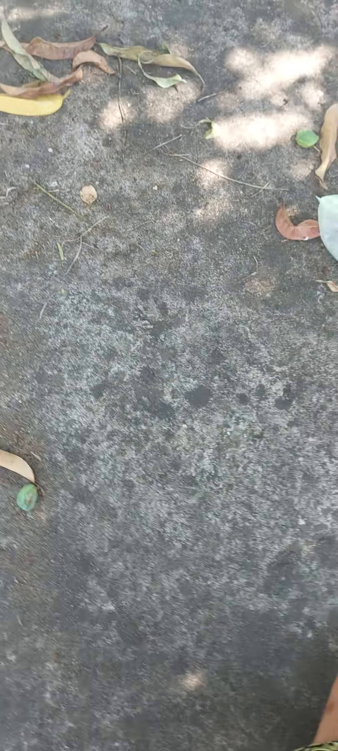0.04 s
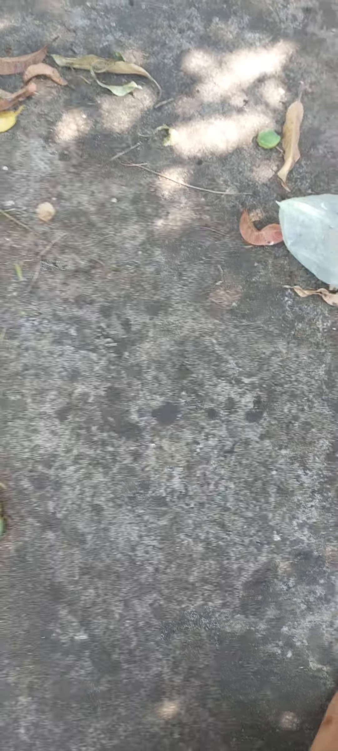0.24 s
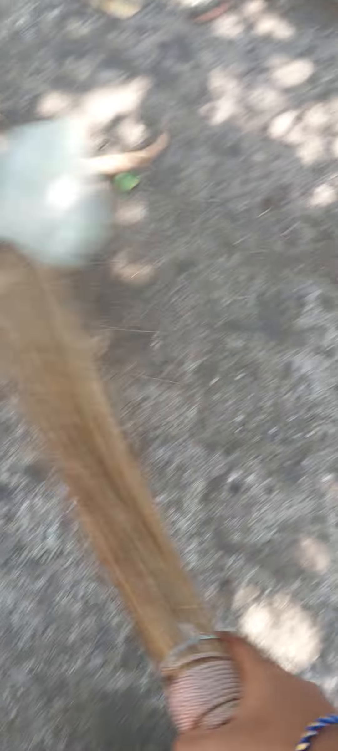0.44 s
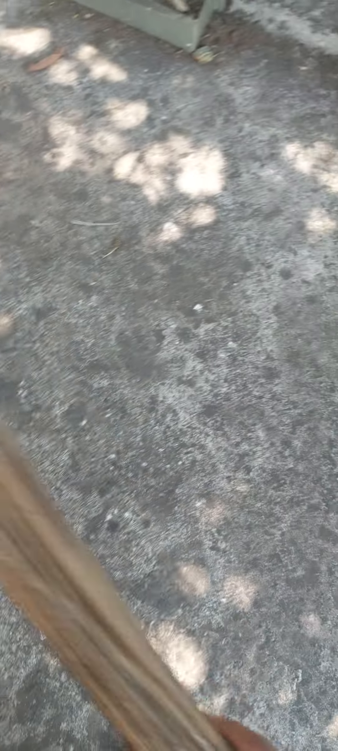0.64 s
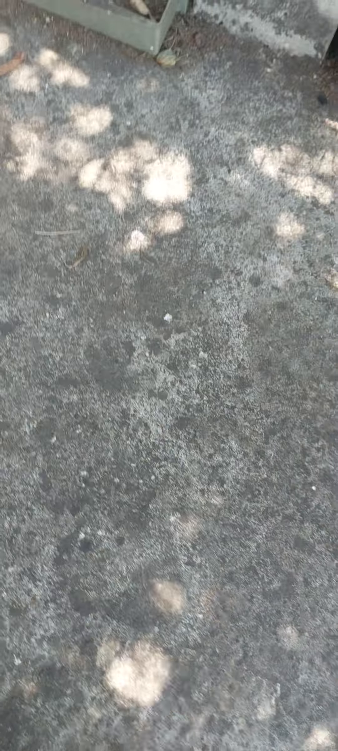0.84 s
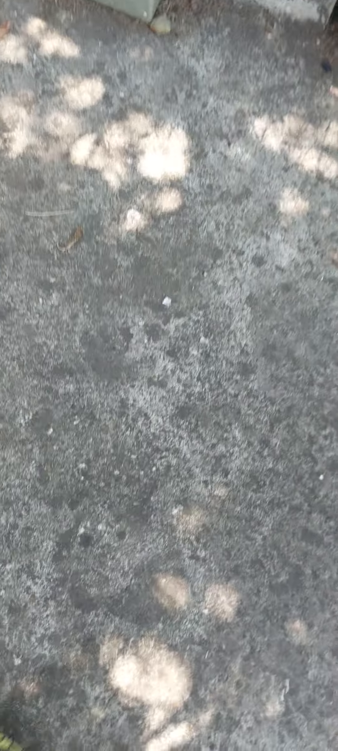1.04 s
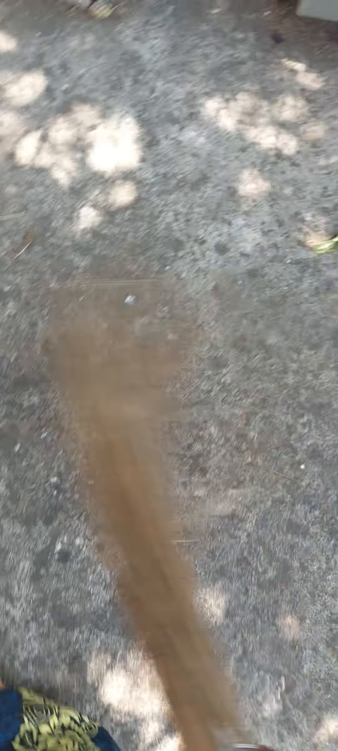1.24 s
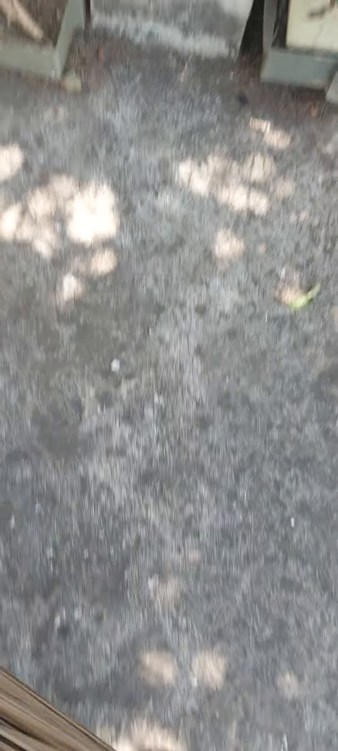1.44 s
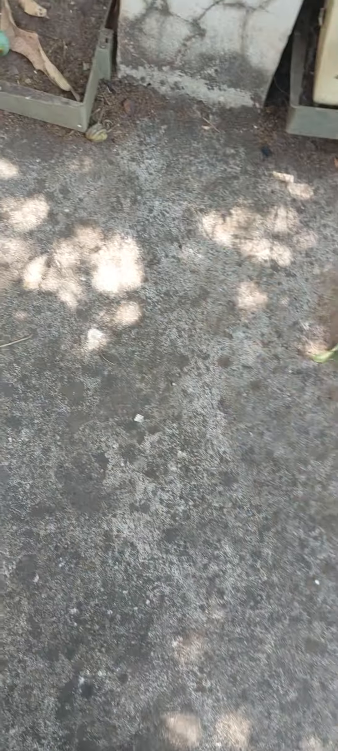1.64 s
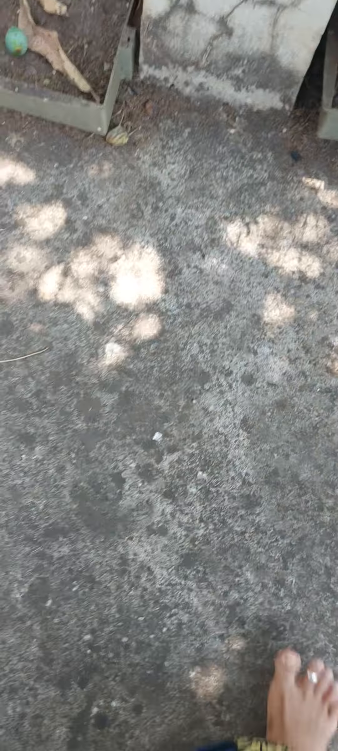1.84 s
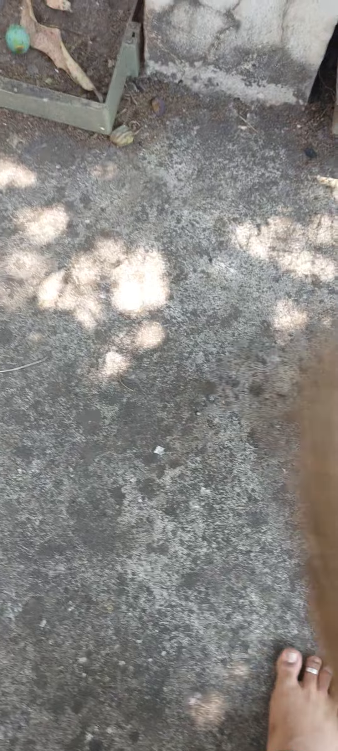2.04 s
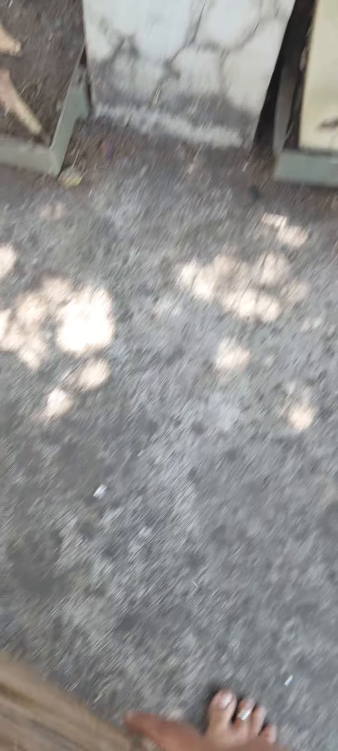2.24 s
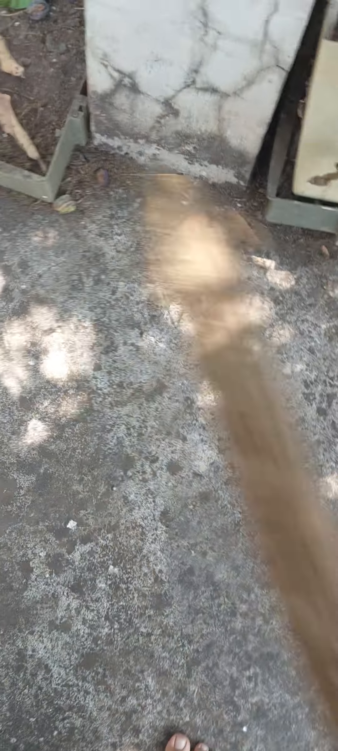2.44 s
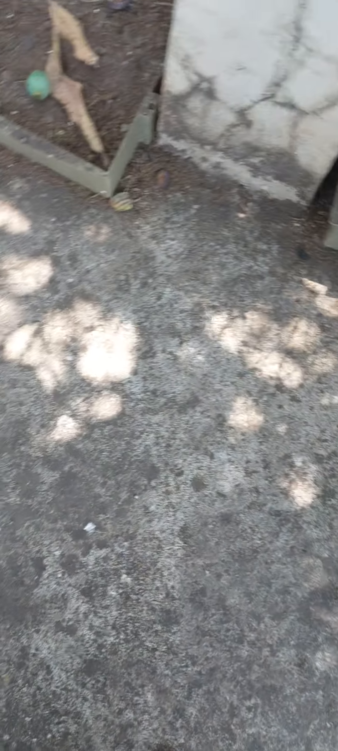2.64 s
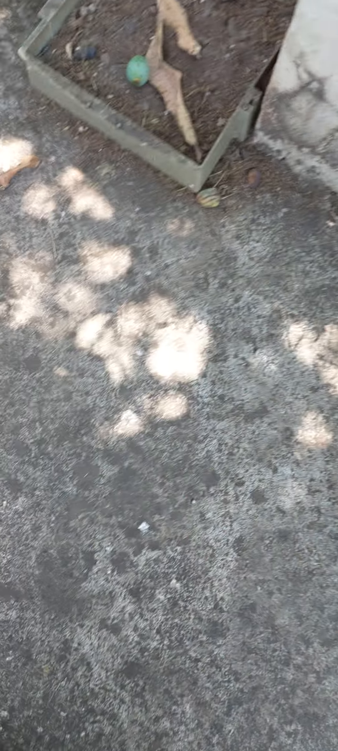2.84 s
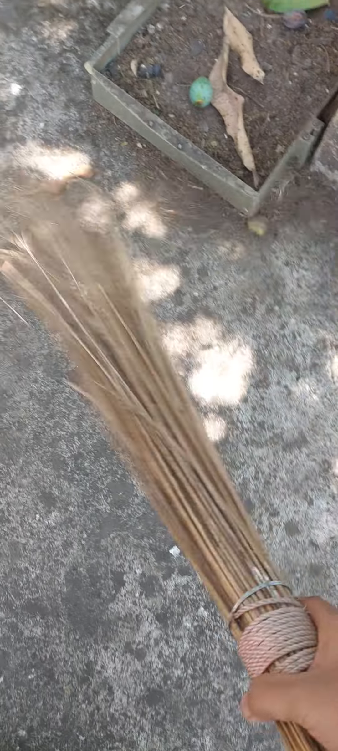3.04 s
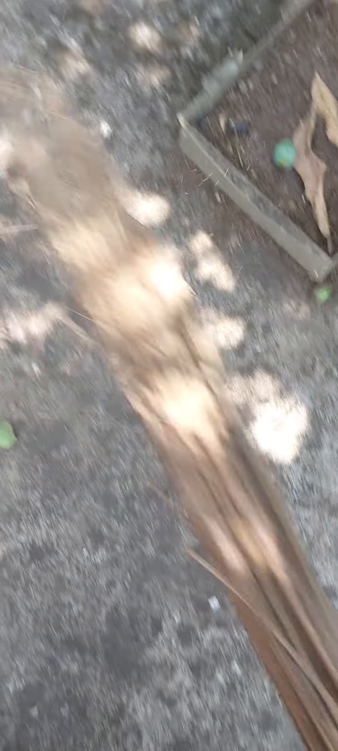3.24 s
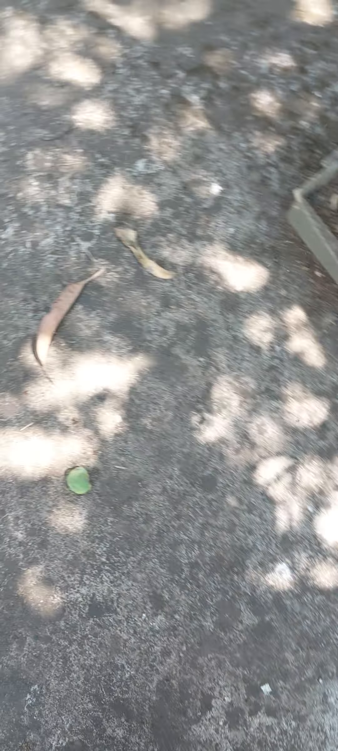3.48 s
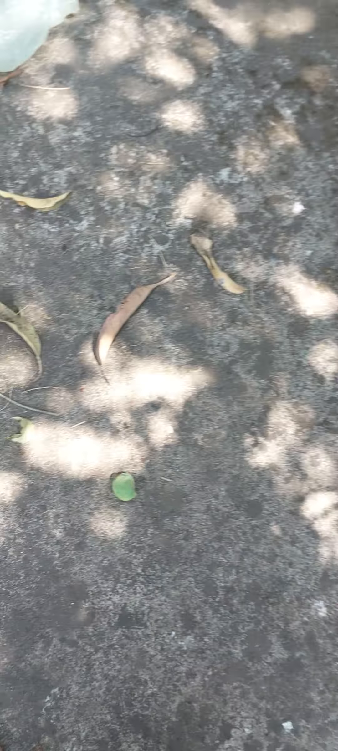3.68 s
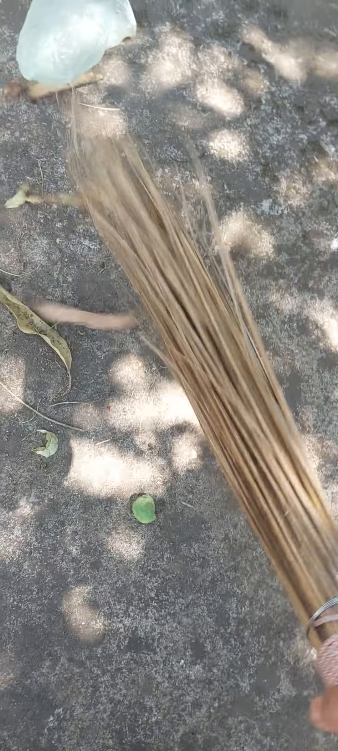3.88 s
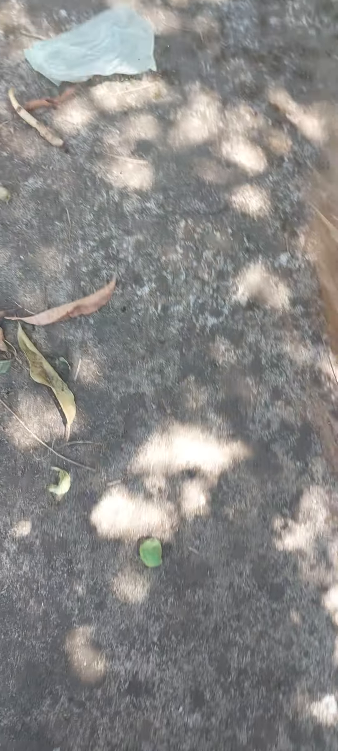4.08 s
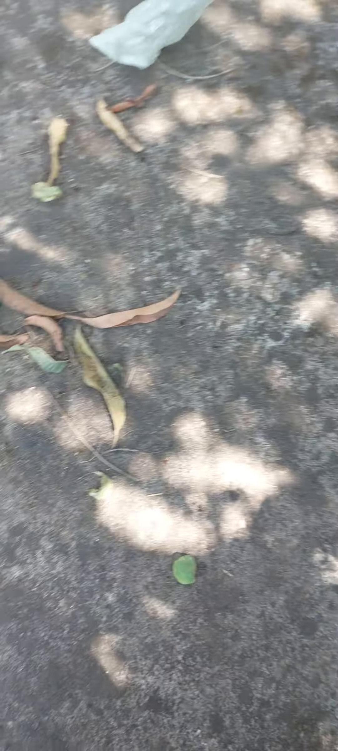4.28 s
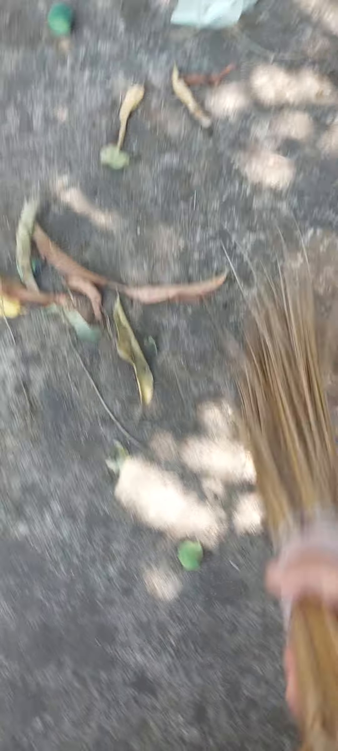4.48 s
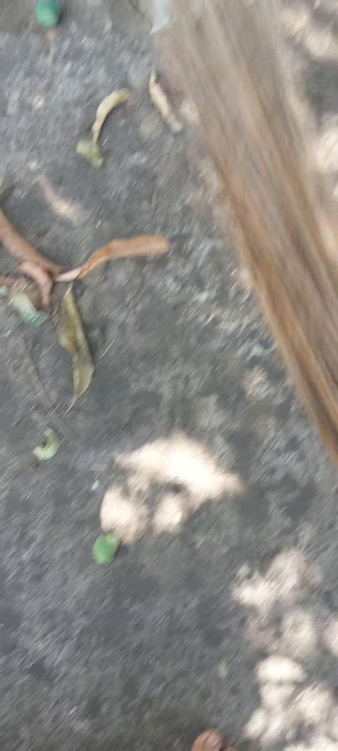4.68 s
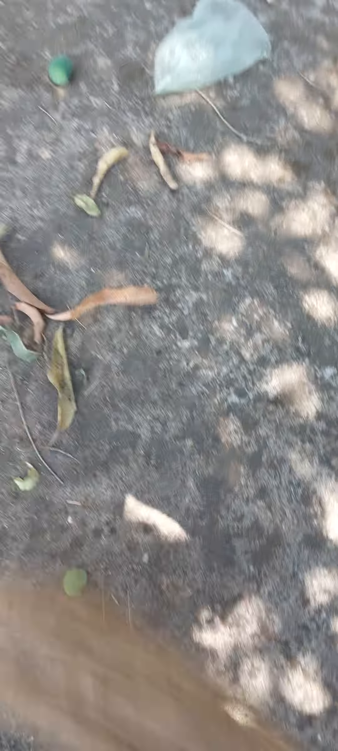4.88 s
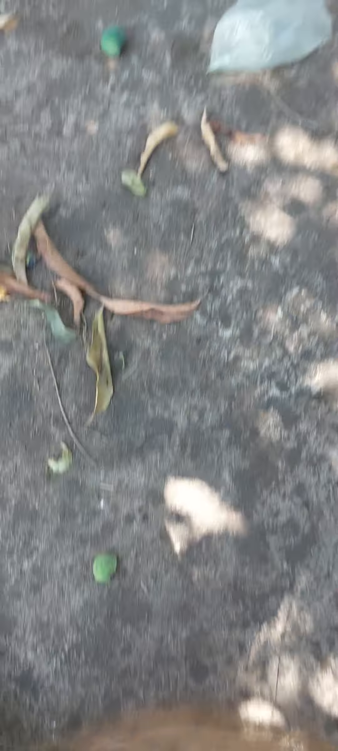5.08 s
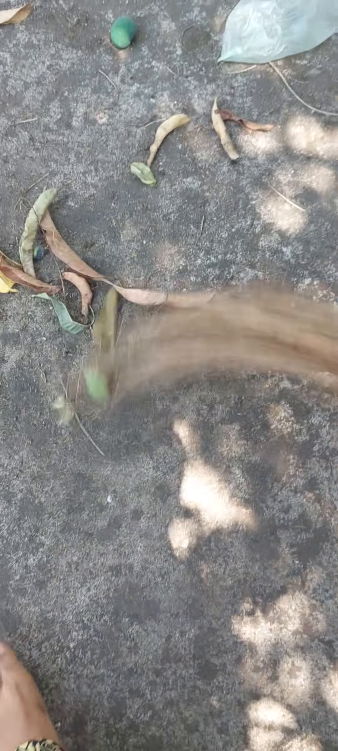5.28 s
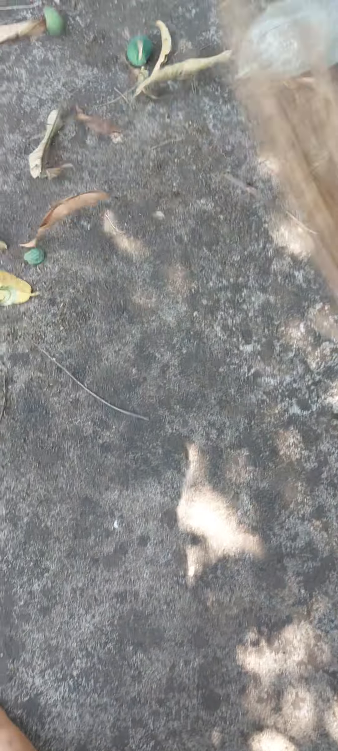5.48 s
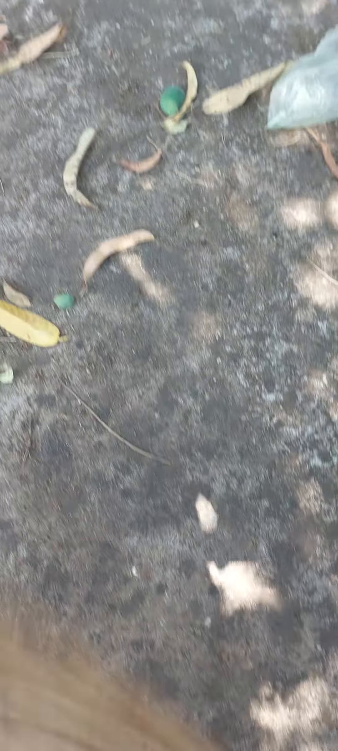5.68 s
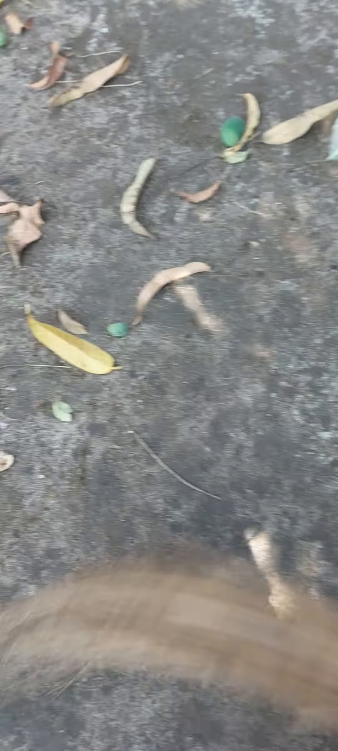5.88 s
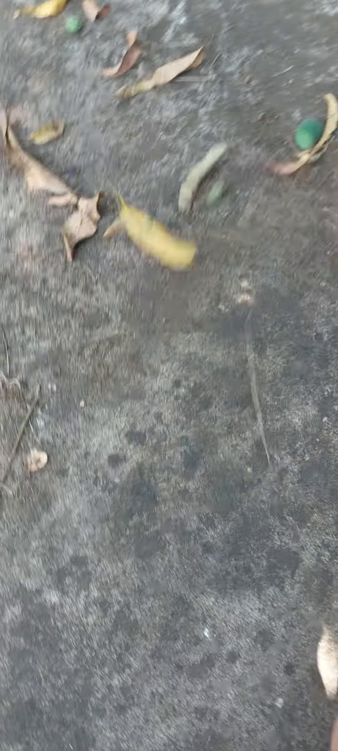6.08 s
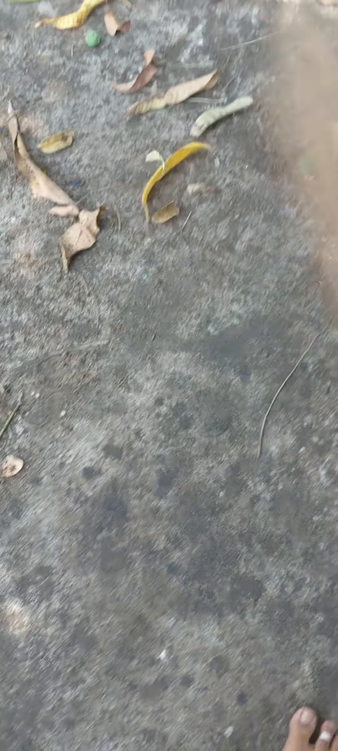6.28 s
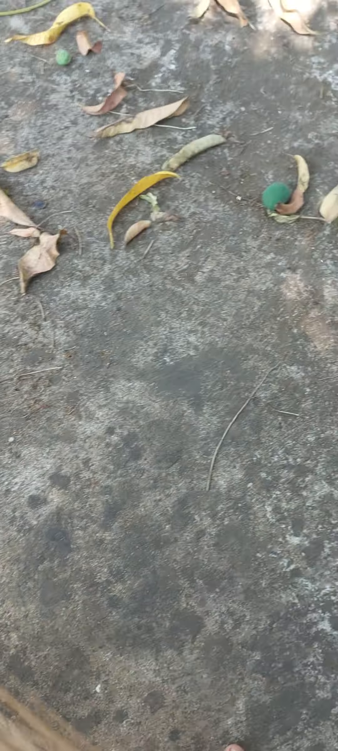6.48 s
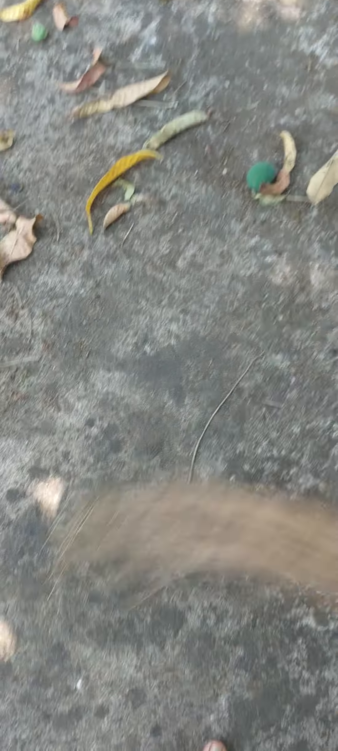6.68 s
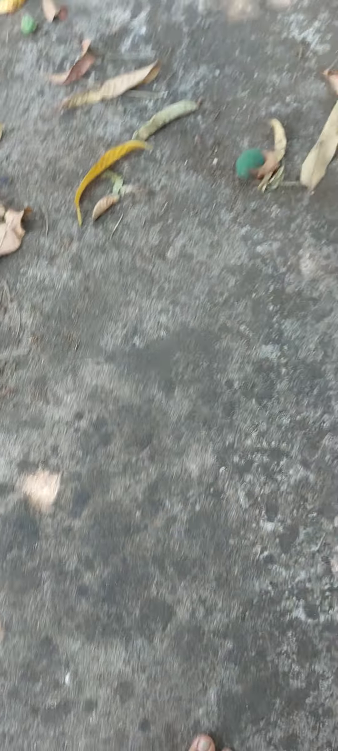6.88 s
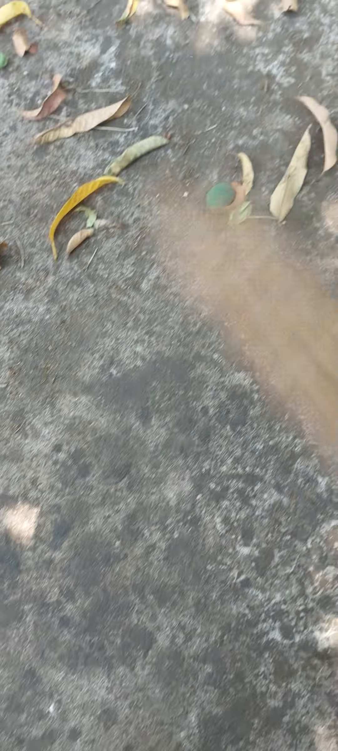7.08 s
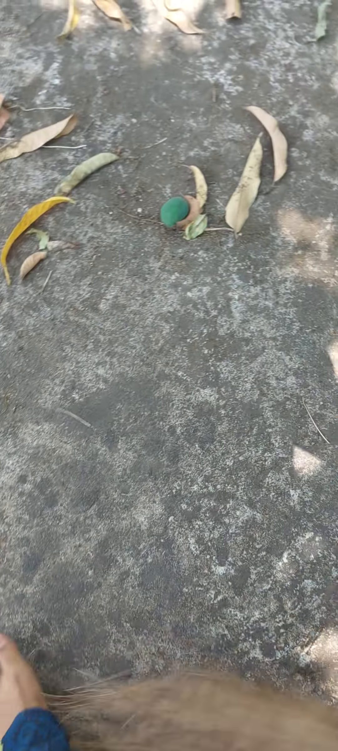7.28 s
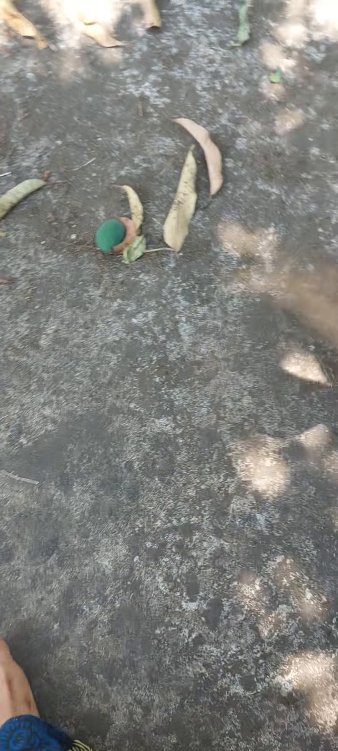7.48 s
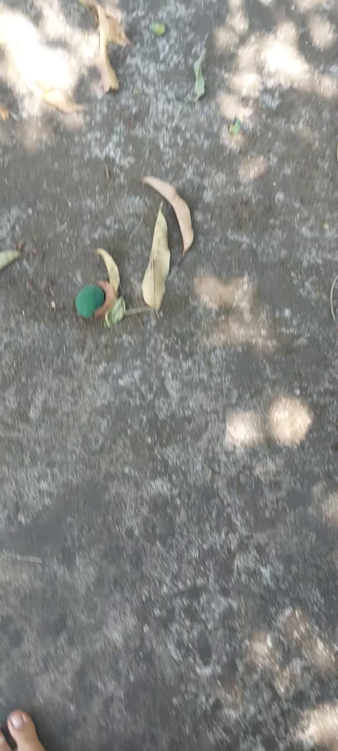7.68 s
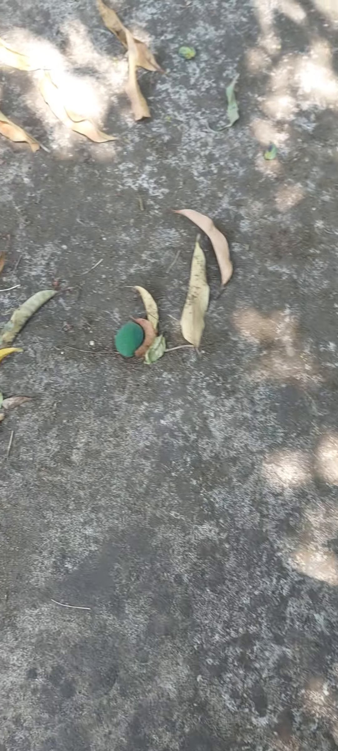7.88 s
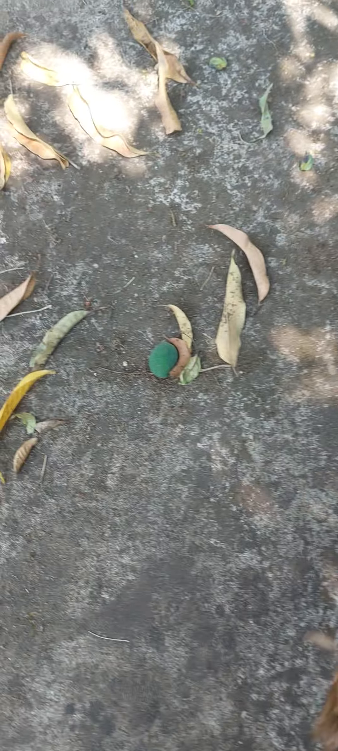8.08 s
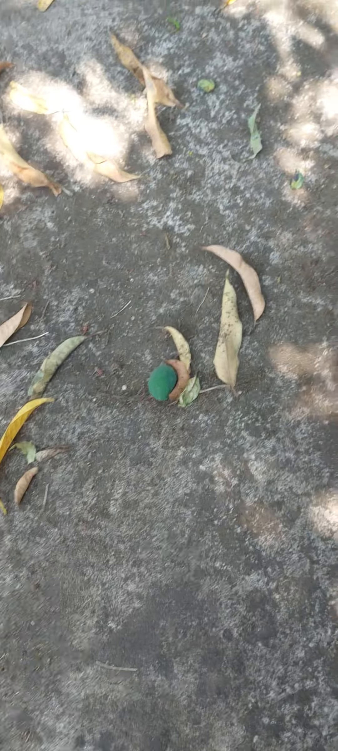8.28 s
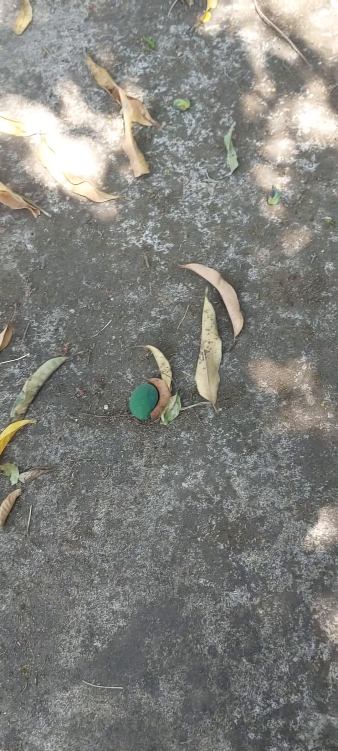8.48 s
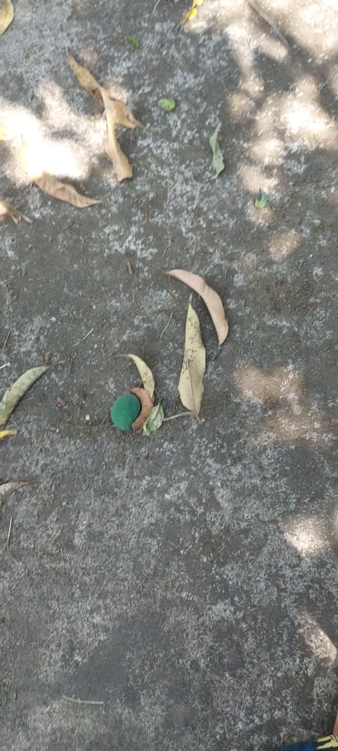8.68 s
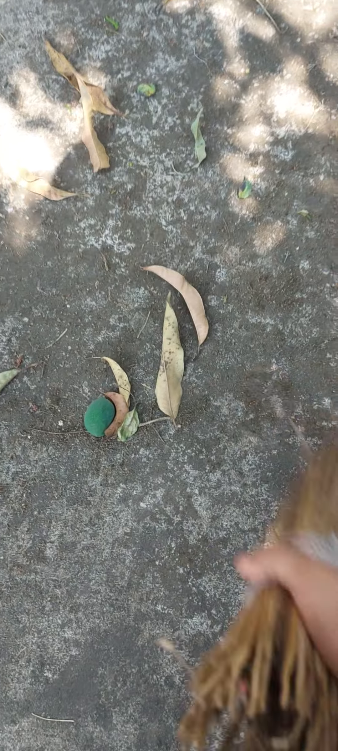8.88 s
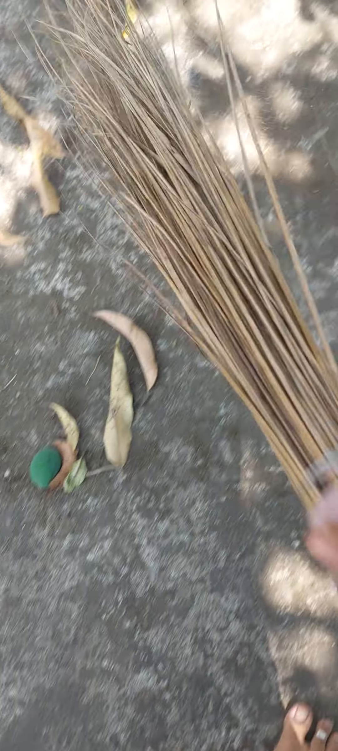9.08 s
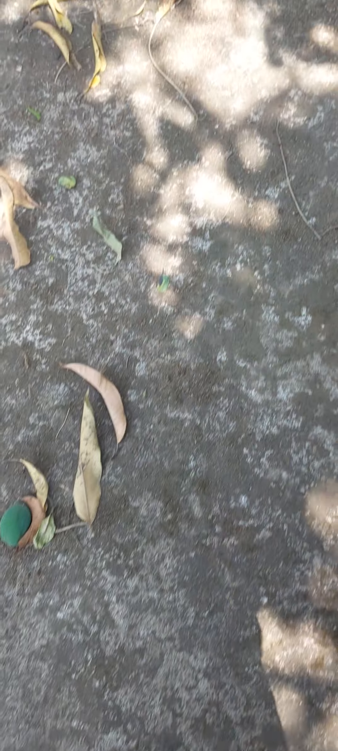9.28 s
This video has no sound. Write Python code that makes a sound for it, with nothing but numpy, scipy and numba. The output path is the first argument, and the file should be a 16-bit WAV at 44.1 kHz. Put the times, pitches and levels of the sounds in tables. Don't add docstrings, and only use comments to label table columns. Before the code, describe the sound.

Gritty rhythmic broom swishes with leaf rustle, twig cracks and dull knocks on a concrete yard, over a faint low single-cylinder engine.

```python
import sys
import numpy as np
from scipy import signal
from scipy.fft import rfft, irfft, next_fast_len
from scipy.io import wavfile
from scipy.ndimage import uniform_filter1d
from numba import njit

SR = 44100
rng = np.random.default_rng(int(sys.argv[2]) if len(sys.argv) > 2 else 0)


def voltage_ratio(decibels):
    exponent = np.asarray(decibels, float) / 20
    return 10 ** exponent


def bounce(signal):
    frames = np.transpose(np.atleast_2d(signal))
    limited = np.clip(frames, -1, 1)
    pcm = np.round(limited * 32767).astype(np.int16)
    wavfile.write(sys.argv[1], SR, pcm)


N = 411453
T = np.arange(N) / SR
SIDES = np.array([[1], [-1]])

# (full contact [s], hold [s], twig tips [dB], rise [s], fall [s])
STROKES = [(0.395, .16, -25, .11, .09), (1.22, .19, -25, .08, .075), (2.057, .19, -25.5, .085, .11),
           (2.915, .25, -25, .12, .075), (3.788, .13, -24, .14, .16), (4.5, .11, -25, .17, .17),
           (5.28, .14, -24, .2, .14), (6.079, .065, -23.5, .3, .14), (6.787, .09, -24.5, .27, .19),
           (7.478, .1, -25, .21, .1), (8.16, .14, -28.5, .2, .16), (8.958, .075, -21.5, .24, .3)]
# (time [s], level [dB], hold [s], change while holding [dB])
DRAGS = [(0.0, -44.5, 0.23, -22), (0.601, -43, .17, -6), (0.783, -45.5, 0.071, -11),
         (0.867, -50.5, 0.3, -18), (1.466, -45.5, 0.1, -10), (1.597, -48.5, 0.085, -8.5),
         (1.895, -63, 0.071, 3), (1.996, -40, .03, 4), (2.346, -50.5, 0.35, -12), (2.59, -54, 0.078, -15),
         (2.847, -42, .05, 6), (3.25, -51, 0.11, 1), (3.392, -51.5, 0.1, -14), (3.561, -44, .03, 3),
         (3.597, -41, 0.097, -15.5), (4.079, -52, 0.13, 0), (4.295, -30, .12, -12), (5.029, -33, .07, -9),
         (5.148, -37, .05, 0), (5.5, -38, .27, -15.5), (5.817, -35, .08, -10), (6.236, -45, 0.26, -15),
         (6.605, -47, .08, 3), (7.03, -59, .06, -6), (7.11, -52, .08, -4), (7.276, -36.5, .11, -5),
         (7.411, -36, .04, 0), (7.646, -46.5, .16, -20), (7.933, -59, .04, 3), (7.976, -41, .1, -2.5),
         (8.44, -52.5, .1, -5), (8.63, -59.5, 0.074, 8), (8.714, -41, 0.08, -6), (9.237, -47, .1, 3)]
# (time [s], body over treble [dB], low end over body [dB])
PRESSURE = [(.45, 1.5, -3.5), (1.3, -0.5, -1.5), (2.15, -2, -0.5), (3.0, 0, -4), (3.6, -3.5, -2.5),
            (3.85, 1.5, -4), (4.32, -1.5, 1), (4.55, 2.5, -4.5), (5.06, -3, 3.5), (5.33, -0.5, 0),
            (5.86, -2, 8), (6.1, -0.5, -2.5), (6.62, -3, 4), (6.8, -3.5, -1.5), (7.3, 0.5, 3),
            (7.52, -3, 0.5), (8.221, 3, -4), (8.74, 1, 1), (9.0, 0.5, -4.5)]
# (frequency [Hz], density [dB per Hz])
TIP_TONE = [(590, -18.5), (1000, -15.5), (1350, -10.5), (1830, -4), (2410, -6.5), (3270, -4.5), (4020, -6),
            (4730, -4), (7530, -2.5), (8500, -5), (10100, -1.5), (11300, 4), (13000, 4), (15100, 3.5),
            (16000, -2)]
# (time [s], level [dB], gather [s], scatter [s], ring [Hz])
PILES = [(.54, -22.5, 0.23, 0.19, 4360), (1.38, -34, 0.45, 0.3, 4300), (2.24, -29.5, 0.31, 0.18, 4075),
         (3.15, -31.5, 0.44, 0.28, 4220), (3.921, -29.5, 0.11, 0.49, 4500), (4.55, -31.5, 0.4, 0.44, 3720),
         (5.27, -29.5, 0.25, 0.1, 3250), (5.45, -22.5, 0.17, 0.14, 4418), (6.15, -31, 0.64, 0.6, 4550),
         (6.78, -29, 0.17, 0.44, 3532), (6.96, -29.5, 0.41, 0.13, 4920), (7.49, -34.5, 0.5, 0.41, 3620),
         (8.26, -38.5, 0.48, 0.48, 3780), (9.0, -31, 0.41, 0.42, 4100)]
# (time [s], level [dB], hold [s], change while holding [dB])
TUMBLES = [(0.0, -39, 0.054, -0.5), (0.624, -37, 0.23, -3.5), (0.797, -32, 0.025, -5),
           (0.865, -40, 0.29, -4.5), (1.87, -49, 0.1, 1.5), (2.325, -43, 0.25, 0.5),
           (2.668, -39, 0.086, -17), (3.256, -50, 0.065, 9), (4.08, -56, 0.22, -4),
           (5.54, -32.5, 0.28, -0.5), (6.405, -61, 0.13, 19.5), (7.061, -52, 0.13, 4), (7.42, -38, .04, 3),
           (7.858, -41.5, 0.011, -23), (8.497, -58, 0.081, 4), (9.208, -46.5, 0.15, 0.5)]
# (time [s], left over right [dB])
BROOM_PLACE = [(0.0, 0.0), (1.5, -2.5), (2.1, -4), (3.3, -.5), (3.56, -7), (3.77, -1), (4.24, -5),
               (4.62, 3.5), (4.99, -6), (5.53, -1.5), (6.08, -4.5), (6.4, -2), (6.86, -6.5), (7.58, -7),
               (8.26, .5), (8.7, -3.5), (9.07, 3.5)]
# (frequency [Hz], density [dB per Hz])
MURMUR_TONE = [(18, -32), (30, -10.5), (86, -4), (124, -12), (250, -15), (440, -22), (700, -34.5),
               (1460, -25.5), (3060, -33.5), (3580, -27.5), (8520, -44), (16000, -43)]
# (time [s], level [dB])
LULL = [(0, 3), (1.2, 3), (1.6, -3.5), (2.0, -2), (2.5, -2.5), (3.6, -3), (4.5, 2), (9.33, -1)]
# (time [s], level [dB])
BRAKE_SQUEAL = [(4.58, -80), (4.66, -67), (5.01, -67), (5.06, -80)]
# (time [s], level [dB], pitch [Hz])
THUDS = [(.03, -58, 62), (.5, -51, 88), (1.35, -58, 65), (1.8, -52, 66), (1.92, -49, 52.2), (2.2, -55, 105),
         (2.28, -58, 72.5)]
# (time [s], peak [dB])
TICKS = [(0.1889, -48), (0.7513, -41), (0.808, -34), (1.1053, -43), (1.1357, -39), (1.7446, -43),
         (3.261, -36), (3.2908, -37), (6.5479, -35), (7.1125, -35), (7.1775, -38), (7.224, -38),
         (7.7392, -37), (8.4834, -41), (8.508, -40), (8.5204, -40), (8.5269, -37), (8.5648, -40),
         (8.5804, -45), (8.5953, -41), (8.6217, -44), (8.6626, -44)]
# (time [s], peak [dB], body over treble [dB], decay t60 [s])
FLICKS = [(.22, -30, -7.5, 0.017), (0.2504, -37.5, 1, 0.011), (.5043, -10, -13, 0.032),
          (0.6548, -30.5, 5.5, 0.033), (.6917, -32, 5, .015), (.785, -29.5, 7, 0.011),
          (0.8616, -25, 3.5, 0.049), (1.0787, -37, -6, .012), (1.541, -38, -5, 0.0099),
          (1.5928, -29.5, -6, .03), (1.6265, -37, -5, 0.013), (2.3675, -33.5, -2, 0.018),
          (2.47, -36.5, 7, 0.017), (2.545, -41, -2, .012), (2.587, -35, -7, .035), (2.662, -39, -12, .015),
          (3.159, -21, 4, .015), (3.3328, -28.5, -3, 0.016), (3.357, -29.5, -9, .012),
          (3.3755, -37, -7, 0.01), (3.458, -41, -6, .012), (3.493, -35, -5, 0.014), (3.5285, -42, -13, .04),
          (3.5513, -36, -14, 0.037), (3.5997, -37, -2, .02), (3.861, -18.5, 8.5, 0.02),
          (4.145, -46, -9, .02), (4.1818, -32, -4, .012), (4.1877, -35.5, -8, .012),
          (4.249, -38, -12, .012), (4.4413, -21, -19, .02), (5.038, -31, -9, 0.019), (5.5318, -28, -1, .03),
          (5.5643, -21, -6, .03), (5.5976, -29.5, 12.5, 0.082), (5.654, -23.5, 3, 0.04),
          (5.7803, -31, 4, 0.035), (5.8104, -20.5, -2, .03), (6.1769, -12, -10, 0.018),
          (6.4448, -38, -3, 0.029), (6.5017, -41, 8, .04), (6.526, -33, 1, 0.021), (7.1075, -32, -13, 0.03),
          (7.646, -33, 4, .015), (7.65, -34, 2, 0.019), (7.8313, -39, -10, 0.011),
          (7.8386, -36.5, -3, .015), (7.8475, -32, -5, 0.043), (7.9223, -32, -17, 0.013),
          (7.968, -33, -10, .03)]
# (frequency [Hz], level [dB])
FLICK_TREBLE = [(4500, -22), (6500, -6), (7400, 1.5), (8700, -8.5), (11500, -1.5), (15800, -12)]
FLICK_BODY = [(500, -32), (1500, -4.5), (4500, -1), (6500, -12)]
# (time [s], peak [dB], ring [Hz], crackle length [s])
SNAPS = [(0.225, -32, 5020, 0.0076), (0.249, -30.5, 5980, 0.0037), (0.506, -19, 4480, 0.059),
         (0.61, -28, 5020, 0.021), (0.657, -30, 5200, 0.011), (0.689, -27.5, 5330, 0.0098),
         (0.785, -26, 2100, 0.0038), (0.794, -41, 3300, 0.029), (0.87, -31, 3500, 0.025),
         (1.594, -30, 5500, 0.0085), (2.464, -39, 1700, 0.04), (2.492, -37.5, 2600, 0.017),
         (3.159, -19.5, 4660, 0.028), (3.332, -34.5, 3920, 0.018), (3.376, -45, 4050, 0.017),
         (3.41, -37, 4100, .012), (3.492, -27.5, 4210, 0.004), (3.857, -29, 2360, 0.018),
         (3.97, -20, 3550, .015), (4.056, -29.5, 3200, 0.021), (4.112, -43, 4500, .02),
         (4.1823, -29, 4830, 0.0045), (4.191, -30, 4840, 0.0051), (5.427, -20, 4700, 0.05),
         (5.477, -15, 4730, 0.027), (5.532, -30, 4000, 0.009), (5.6, -17.5, 3940, 0.018),
         (5.654, -26, 3520, .02), (5.709, -30, 3404, 0.013), (5.777, -29, 3320, 0.025),
         (5.807, -25, 3550, 0.014), (5.82, -16, 3350, .006), (6.176, -17, 4070, 0.0052),
         (6.5, -41, 2500, 0.019), (6.529, -35.5, 2706, .012), (7.074, -35, 4545, 0.0053),
         (7.149, -36, 4440, .005), (8.482, -35, 4700, .005), (8.521, -41, 4200, 0.016),
         (8.562, -36.5, 3320, 0.0094), (8.617, -44, 3320, 0.013), (9.253, -31.5, 5000, 0.018)]
# (time [s], peak [dB], pitch [Hz], decay t60 [s])
KNOCKS = [(0.505, -29, 209, 0.067), (1.359, -32.5, 268, 0.051), (2.217, -38, 242, 0.086),
          (3.158, -35, 179.4, 0.065), (3.873, -47, 180.4, 0.068), (5.037, -27, 240, 0.16),
          (5.408, -34, 305, 0.088), (5.599, -26.5, 262, 0.07), (6.957, -29.5, 286.1, 0.11)]
# (multiple of its pitch, level [dB])
KNOCK_MODES = [(1, -2), (1.3, -0.5), (.72, -7.5), (1.7, -5.5), (2.3, -8), (3.1, -22)]
# (time [s], pipe [dB], boom over pipe [dB])
LUMPY = [
    [(2.66, -54, 1), (2.702, -41.5, -22), (2.852, -38, -13), (2.914, -43.5, 9.5), (3.108, -38.5, -5),
     (3.306, -45, 2), (3.534, -41.5, 5), (3.65, -39.5, -9), (4.05, -42, 3)],
    [(7.75, -43, -9), (7.938, -45, -0.5), (8.03, -52, 7), (8.198, -48, 3), (8.34, -49, 3),
     (8.712, -43.5, -12), (8.894, -36.5, -11), (9.1, -37.5, -2), (9.33, -40.5, -14)],
]
# (time [s], crank rate [Hz], every second blow weaker by [dB])
CRANK = [(2.66, 20, 3), (2.8, 26.5, 0), (3.1, 26, 0), (3.3, 21.5, 3), (3.45, 26, 3), (3.6, 23.5, 4),
         (3.8, 25, 2), (4.05, 26, 0), (7.75, 31.5, 0), (7.95, 24.5, 0), (8.5, 24, 2), (8.65, 28.9, 9),
         (9.33, 28.7, 10)]
# (delay [s], level [dB])
YARD_ECHOES = [(0.016, -4.5), (.031, -1.5), (0.059, -7.5)]
# (time [s], firing rate [Hz], level [dB], wall path favours 4th multiple over 2nd [dB])
PULL = [(3.9, 24.85, -62, -3), (4.099, 26.73, -39.5, 6), (4.27, 27.8, -40.5, 5.5), (4.6, 28.33, -42.5, -15),
        (5.7, 29.13, -45, -0.5), (6.05, 30.14, -50, -1), (6.429, 30.28, -42.5, 20),
        (6.95, 30.77, -40.5, 16), (7.4, 31.46, -46, 9.5), (7.78, 31.74, -42.5, 12), (7.9, 30.85, -46, 4)]
# (frequency [Hz], level [dB])
BARK = [(190, -2), (245, -5), (300, -4.5), (370, -4), (430, -7), (500, -11), (600, -17)]
# (multiple, start [s], end [s], level [dB])
CLEAR = [(8, 4.0, 4.2, -58), (11, 4.05, 4.9, -59), (8, 4.6, 5.35, -57), (11, 5.0, 5.5, -60),
         (12, 5.7, 6.05, -60), (8, 5.55, 6.15, -58), (8, 6.2, 6.95, -54), (10, 5.7, 6.1, -60),
         (13, 6.15, 6.65, -62), (10, 4.3, 5.0, -59), (9, 4.0, 4.45, -59), (12, 7.0, 7.8, -60),
         (16, 7.05, 7.8, -64), (11, 7.2, 7.6, -61)]
# (frequency [Hz], level [dB])
ROAR_TONE = [(30, -40), (60, -25), (130, 4.0), (300, 1.5), (700, -17.0), (1500, -23.0)]


def unit(x):
    return x / np.sqrt(np.mean(x ** 2))


def over_time(table):
    s, *columns = np.transpose(table)
    return [np.interp(T, s, column) for column in columns]


def colour(x, points):
    size = next_fast_len(N)
    hz, db = np.transpose(points)
    bins = np.arange(size // 2 + 1) * SR / size
    gain = voltage_ratio(np.interp(np.log(bins + 1), np.log(hz), db))
    return irfft(rfft(x, size) * gain, size)[..., :N]


def ring(x, hz, width_hz):
    return signal.lfilter(*signal.iirpeak(hz, hz / width_hz, SR), x)


def walk(rate):
    steps = rng.standard_normal(600)
    place = T * rate
    k = place.astype(int)
    share = .5 - .5 * np.cos(np.pi * (place - k))
    return 1.15 * (steps[k % 600] * (1 - share) + steps[(k + 1) % 600] * share)


@njit
def grains(start, hz, t60, left, right, lag):
    out = np.zeros((2, N + 20000))
    for k in range(len(start)):
        turn = np.exp(2j * np.pi * hz[k] / SR - np.log(1000) / (t60[k] * SR))
        z, rise, rise_step = 1 + 0j, 1., np.exp(-1.5 * hz[k] / SR)
        first = start[k] + 40
        for i in range(first, first + int(t60[k] * SR)):
            z *= turn
            rise *= rise_step
            out[0, i] += left[k] * z.imag * (1 - rise)
            out[1, i + lag[k]] += right[k] * z.imag * (1 - rise)
    return out[:, 40:N + 40]


def swells(s, hold, db, change_db, rise, fall, arch_db=0., shoulder=0.99):
    t = T[::64]
    columns = (s, hold, db, change_db, rise, fall)
    s, hold, db, change_db, rise, fall = (np.reshape(c, (-1, 1)) for c in columns)
    along = np.clip((t - s) / np.maximum(hold, 1e-3), 0, 1)
    edges = (np.maximum(s - t, 0) / rise + np.maximum(t - s - hold, 0) / fall) ** shoulder
    level_db = db + change_db * along + arch_db * np.sin(np.pi * along) - 30 * edges
    return np.interp(T, t, np.sum(voltage_ratio(level_db) ** 2, axis=0))


def gestures():
    press_db, arch_db = 2.5, 2.5
    s, hold, db, rise, fall = np.transpose(STROKES)
    strokes = swells(s, hold, db - press_db - arch_db / 2, press_db, rise, fall, arch_db, shoulder=1.3)
    s, db, hold, change_db = np.transpose(DRAGS)
    drags = swells(s, hold, db, change_db, rise=.028, fall=.04)
    tips = strokes + drags + voltage_ratio(-68.5) ** 2
    s, db, hold, change_db = np.transpose(TUMBLES)
    loose = swells(s, hold, db, change_db, rise=0.066, fall=0.18)
    s, db, gather, scatter, hz = np.transpose(PILES)
    piles = swells(s, 0, db, 0, gather, scatter)
    carried = drags * voltage_ratio(-15.5) ** 2
    leaves = piles + loose + carried + voltage_ratio(-98) ** 2
    leaves_hz = np.interp(T, s, hz) * 2 ** (0.21 * walk(9.7))
    return 10 * np.log10(tips), 10 * np.log10(leaves / tips), leaves_hz


def ticks(rate, spread_db):
    hit = rng.random((2, N)) < rate / SR
    strength_db = spread_db * rng.exponential(size=(2, N)).clip(0, 6)
    x = hit * rng.standard_normal((2, N)) * voltage_ratio(strength_db)
    return unit(x / np.sqrt(rate))


def patchy(x, body_db, low_db, patch_db, rate):
    size = next_fast_len(N)
    spectrum = rfft(x, size)
    bins = np.arange(size // 2 + 1) * SR / size
    place = 2 * np.log2(bins / 700 + 1e-3).clip(0, 4.5)
    out = 0
    for k in range(10):
        band = irfft(spectrum * np.clip(1 - abs(place - k), 0, 1), size)[..., :N]
        out = out + band * voltage_ratio(patch_db * walk(rate) + body_db * (k < 8) + low_db * (k < 4))
    return unit(out)


def scrape(busy, count, centre_hz, octaves, cycles, spread_db):
    total = np.cumsum(busy)
    u = rng.random((count, 6)).T
    start = np.searchsorted(total, u[0] * total[-1])
    hz = centre_hz[start] * 2 ** (octaves * (u[1] + u[5] - 1))
    size = voltage_ratio(-spread_db * np.log(u[2] + 0.0018)) / np.sqrt(busy[start])
    lean = voltage_ratio(8.9 * (u[3] - .5))
    lag = (44 * (u[4] - .5)).astype(np.int64)
    return unit(grains(start, hz, cycles / hz, size * lean, size / lean, lag))


def broom():
    tips_db, leaves_db, leaves_hz = gestures()
    busy = np.clip(voltage_ratio(.6 * (tips_db + 30)), .28, 1)
    loose = 1 - busy
    packed = busy.clip(.5)
    body_db, low_db = over_time(PRESSURE)
    tips = colour(ticks(14000 * busy, spread_db=0.9), TIP_TONE)
    tips = patchy(tips, body_db, low_db, patch_db=1.8, rate=14.) * voltage_ratio(4.0)
    tips = tips * voltage_ratio((.9 + 1.8 * loose) * walk(70))
    leaves = scrape(packed, count=30000, centre_hz=leaves_hz, octaves=1.1, cycles=14, spread_db=1.8)
    leaves = leaves * voltage_ratio(leaves_db - 7.0 + (2.5 + 0.3 * loose) * walk(40))
    edges = scrape(packed, count=9000, centre_hz=6900 + 0 * T, octaves=.3, cycles=9, spread_db=2.5)
    edges = edges * voltage_ratio(leaves_db - 18.5 + 5.0 * walk(30))
    stalks = scrape(packed, count=11000, centre_hz=1500 + 0 * T, octaves=1.5, cycles=4, spread_db=1.5)
    stalks = stalks * voltage_ratio(leaves_db - 16.0)
    return (tips + leaves + edges + stalks) * voltage_ratio(tips_db)


def yard():
    murmur, swell = 0, walk(0.87)
    mid, side = colour(rng.standard_normal((2, N)), MURMUR_TONE)
    lull_db, = over_time(LULL)
    for hz in 40 * 2 ** np.arange(0, 9.):
        edges = [hz / 2 ** .5, min(hz * 2 ** .5, 16000)]
        octave = signal.butter(2, edges, "band", fs=SR, output="sos")
        width = min(0.3 + hz / 1500, 1)
        pair = signal.sosfilt(octave, mid + width * SIDES * side)
        murmur = murmur + pair * voltage_ratio(.6 * swell + 1.2 * walk(6) + (100 < hz < 500) * lull_db)
    squeal_db = np.interp(T, *np.transpose(BRAKE_SQUEAL), -120, -120)
    squeal = np.sin(2 * np.pi * 2015 * T + .7 * walk(12)) * voltage_ratio(squeal_db)
    return unit(murmur) * voltage_ratio(-53.5) + squeal


def thuds():
    s, db, hz = np.transpose(THUDS)
    start = (s * SR).astype(np.int64)
    t60 = 0.17 + 0 * s
    return grains(start, hz, t60, voltage_ratio(db + 13), voltage_ratio(db + 12.0), 0 * start)


def flicks():
    t = T[:int(.08 * SR)]
    tick_body_db, tick_t60 = -14, 0.022
    rows = list(FLICKS) + [(s, db, tick_body_db, tick_t60) for s, db in TICKS]
    noise = rng.standard_normal((len(rows), 3, len(t)))
    treble, body = np.zeros((2, 2, N))
    for (s, db, body_db, t60), (both, *apart) in zip(rows, noise):
        decay = voltage_ratio(db - 8 - 60 * t / max(t60, .004))
        crack = 1 + 1.8 * np.exp(-t / .0007)
        burst = (1.3 * both + .7 * np.array(apart)) * decay * crack
        span = slice(int(s * SR), int(s * SR) + len(t))
        treble[:, span] += burst
        body[:, span] += burst * voltage_ratio(body_db)
    return colour(treble, FLICK_TREBLE) + colour(body, FLICK_BODY)


def cascade(s, db, length, pitch, u, cycles, fall_db, count):
    late = (np.arange(u.shape[1]) >= count) * u[..., 0] ** 1.5
    size = voltage_ratio(db[:, None] - fall_db * late - 6.9 * u[..., 1]).ravel()
    when = s[:, None] + 0.0016 * u[..., 2] + late * length[:, None]
    start = (when * SR).astype(np.int64).ravel()
    lag = (24 * (u[..., 3] - .5)).astype(np.int64).ravel()
    hz = pitch.ravel()
    return grains(start, hz, cycles / hz + 0.011, size, size, lag)


def snaps():
    s, db, hz, length = np.transpose(SNAPS)
    length = length.clip(.003, .08)
    u = rng.random((len(s), 20, 6))
    ring_hz = hz[:, None] * 2 ** (0.44 * (u[..., 4] + u[..., 5] - 1))
    crowd_db = 10 * np.log10(length / .024)
    return cascade(s, db + crowd_db, length, ring_hz, u, cycles=9.2, fall_db=6.0, count=1)


def knocks():
    s, db, hz, t60 = np.transpose(KNOCKS)[:, :, None]
    ratio, mode_db = np.transpose(KNOCK_MODES)
    start = (s * SR + 0 * ratio).astype(np.int64).ravel()
    size = voltage_ratio(db + mode_db).ravel()
    mode_t60 = (t60 / ratio ** 1.5).ravel()
    wood = grains(start, (hz * ratio).ravel(), mode_t60, size, size, 0 * start)
    u = rng.random((len(s), 24, 5))
    grit_hz = 230 * 2 ** (3.2 * u[..., 4])
    grit = cascade(s[:, 0], db[:, 0] - 7, 0.35 * t60[:, 0], grit_hz, u, cycles=6, fall_db=8, count=3)
    return voltage_ratio(-3.5) * wood + grit


def bike():
    cough = np.zeros(N)
    cough[int(2.592 * SR)] = voltage_ratio(23.5)
    x = ring(ring(cough, 102.4, 9.8), 88, 45) + sum(lumpy(rows) for rows in LUMPY) + pull()
    both, apart = rng.standard_normal((2, N))
    roar = unit(colour(both + 0.48 * SIDES * apart, ROAR_TONE))
    roar = roar * np.sqrt(uniform_filter1d(x ** 2, 4000) + 1e-12) * voltage_ratio(-14.0)
    echo = np.roll(x, int(.021 * SR)) * voltage_ratio(-13) * (T > 1)
    return x * voltage_ratio(SIDES * -.3) - SIDES * echo + roar


def lumpy(rows, uneven_db=2.0, bark_db=-19):
    pipe_db, boom_db = over_time(rows)
    hz, weak_db = over_time(CRANK)
    begin, end = rows[0][0], rows[-1][0]
    on = (T > begin) & (T < end)
    at = np.flatnonzero(np.diff(np.floor(np.cumsum(hz * on) / SR)))
    late, uneven = rng.standard_normal((80, 2))[:len(at)].T
    hit = (at + .0012 * SR * late).astype(int).clip(0, N - 1)
    blows = np.zeros(N)
    blows[hit] = voltage_ratio(uneven_db * uneven - np.arange(len(at)) % 2 * weak_db[at])
    for delay_s, db in YARD_ECHOES:
        blows += voltage_ratio(db) * np.roll(blows, int(delay_s * SR))
    pipe = ring(ring(ring(blows, 92.0, 42), 97.7, 27.0), 108.5, 42)
    boom = ring(ring(blows, 50, 14), 65, 25)
    bark = ring(ring(ring(blows, 241.0, 37), 219, 72.0), 397, 210)
    pipe, boom, bark = (x / np.std(x[on]) for x in (pipe, boom, bark))
    exhaust = pipe + voltage_ratio(boom_db - 8.0) * boom + voltage_ratio(bark_db) * bark
    return (T > begin) * voltage_ratio(pipe_db + 2.5) * exhaust


def pull(waver_db=0.7, far_waver_db=3.0):
    hz, level_db, favour_db = over_time(PULL)
    second_db = level_db - 10 * np.log10(1 + voltage_ratio(favour_db) ** 2)
    fourth_db = level_db - 10 * np.log10(1 + voltage_ratio(-favour_db) ** 2)
    third_db = np.maximum(second_db, fourth_db) - 8.0
    fifth_db = level_db - 6 - np.maximum(favour_db, 0)
    low_db = [second_db - 28, second_db, third_db, fourth_db, fifth_db, fifth_db - 5.5]
    high_db = [level_db - 24 + np.interp(k * hz, *np.transpose(BARK)) for k in range(7, 19)]
    turn = 2 * np.pi * np.cumsum(hz) / SR
    x = 0
    for k, db in enumerate(low_db + high_db):
        waver = walk(3.4) * waver_db if k < len(low_db) else walk(2.237) * far_waver_db
        drift = .06 * k * walk(4)
        x += voltage_ratio(db + waver) * np.sin((k + 1) * turn + k * k + drift)
    x += clear(turn)
    fade = np.clip(np.minimum(T - PULL[0][0], PULL[-1][0] - T) / 0.031, 0, 1)
    return np.sqrt(2) * fade * x


def clear(turn):
    x = 0
    for k, begin, end, db in CLEAR:
        fade = np.clip(np.minimum(T - begin, end - T) / .08 + .5, 0, 1)
        x = x + voltage_ratio(db + 1.0 * walk(3)) * fade * np.sin(k * turn + k)
    return x


def scene():
    left_over_right_db, = over_time(BROOM_PLACE)
    pan = voltage_ratio(SIDES * left_over_right_db / 2)
    near = (broom() + snaps() + flicks()) * pan + knocks()
    t = T[:int(.25 * SR)]
    slap = rng.standard_normal((2, len(t))) * voltage_ratio(-60 * t / 0.17) * (t > .003)
    slapped = signal.fftconvolve(near, slap, axes=1)[:, :N]
    return near + voltage_ratio(-36) * slapped + bike() + yard() + thuds()


def low_pass(x):
    return signal.sosfilt(signal.butter(12, 17070, fs=SR, output="sos"), x)


def record(dry):
    bass = signal.butter(3, 38, "high", fs=SR, output="sos")
    top = signal.ellip(10, .3, 50, 15800, fs=SR, output="sos")
    mix = signal.sosfilt(np.vstack([bass, top]), dry)
    return low_pass(mix)


dry = scene()
out = record(dry)
bounce(out)
```